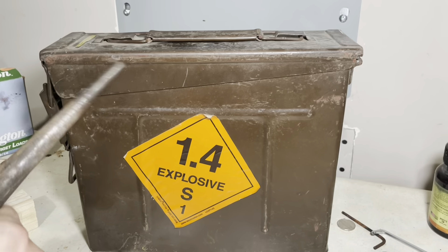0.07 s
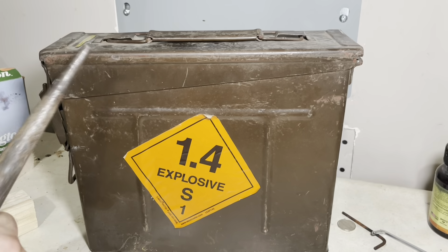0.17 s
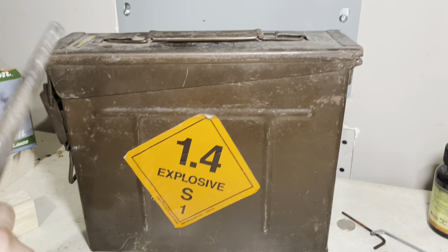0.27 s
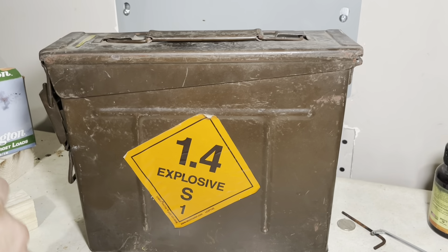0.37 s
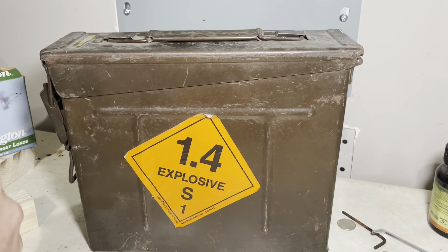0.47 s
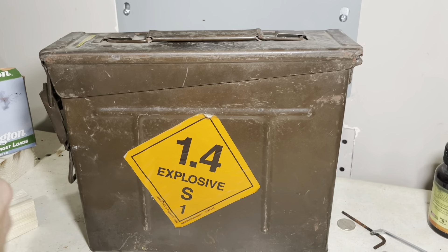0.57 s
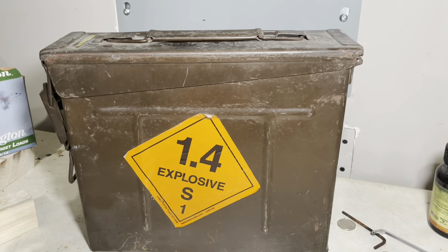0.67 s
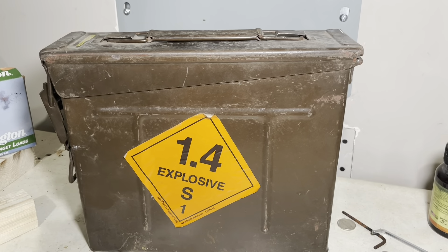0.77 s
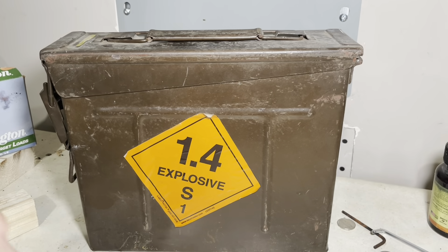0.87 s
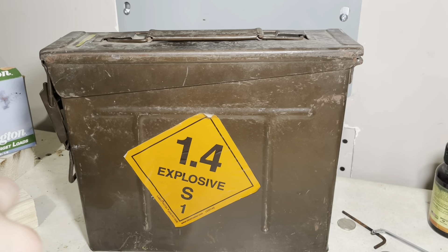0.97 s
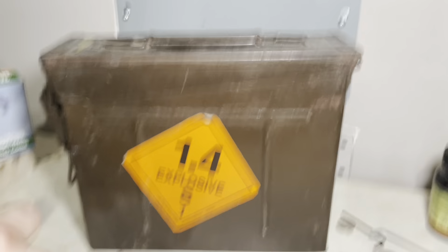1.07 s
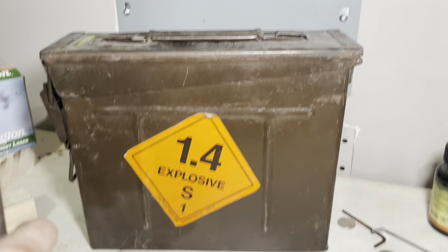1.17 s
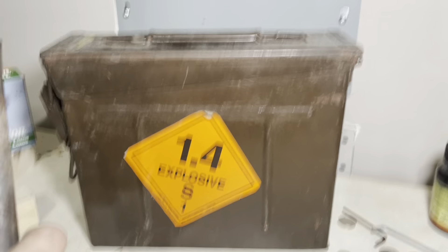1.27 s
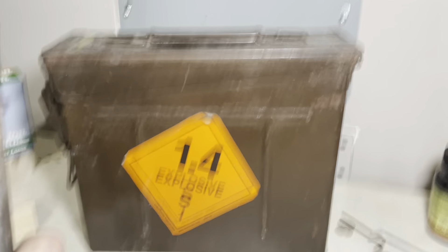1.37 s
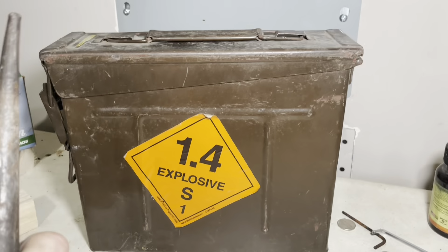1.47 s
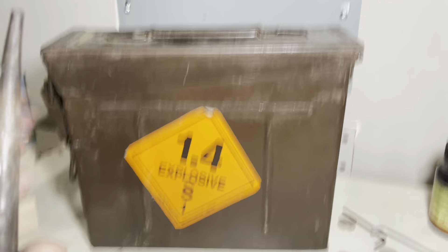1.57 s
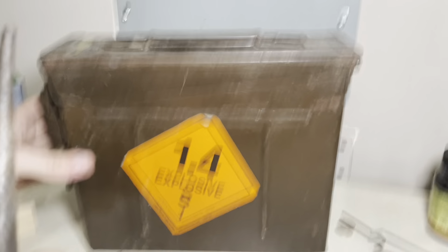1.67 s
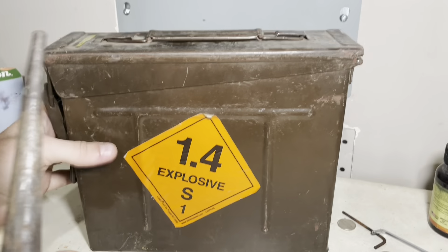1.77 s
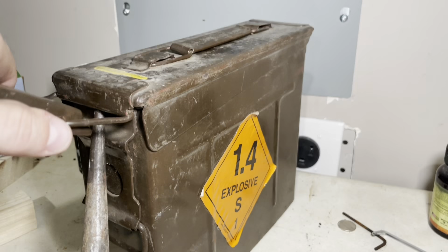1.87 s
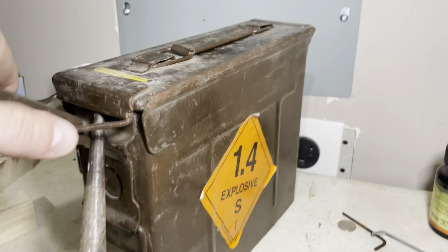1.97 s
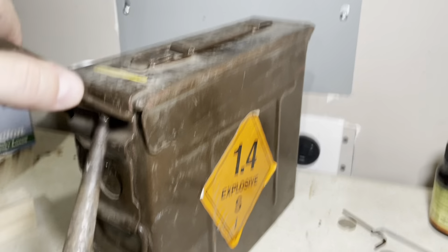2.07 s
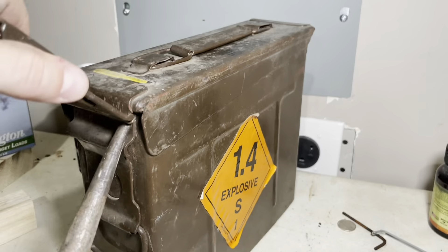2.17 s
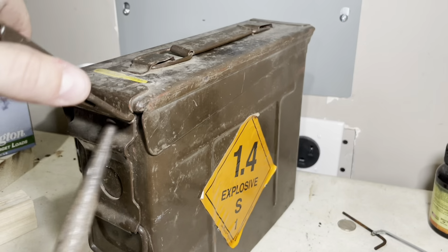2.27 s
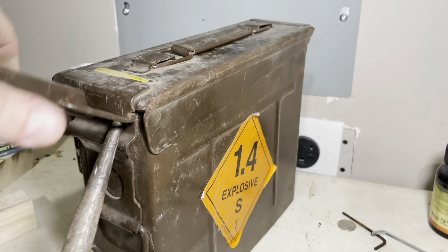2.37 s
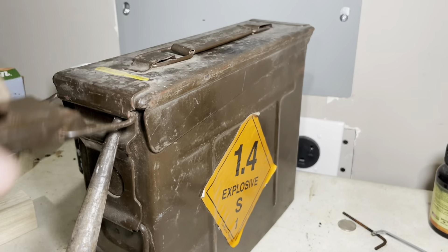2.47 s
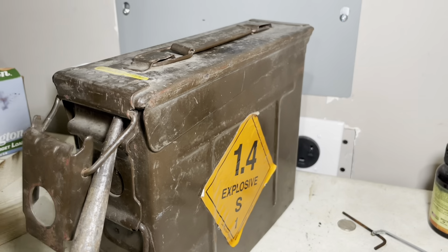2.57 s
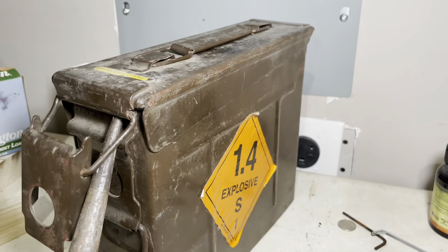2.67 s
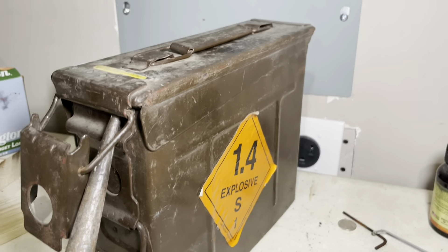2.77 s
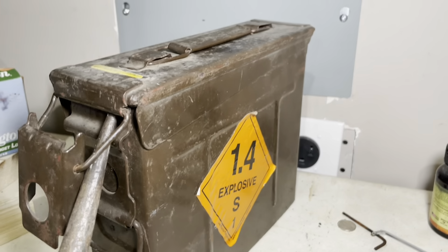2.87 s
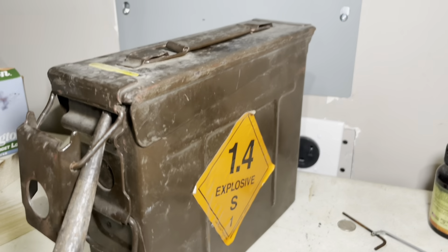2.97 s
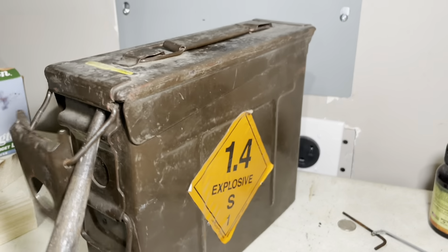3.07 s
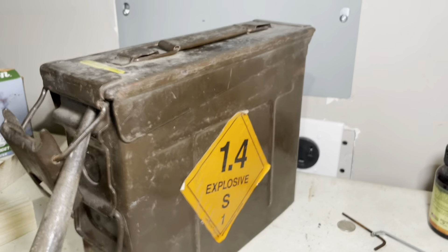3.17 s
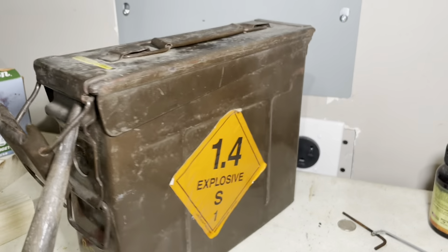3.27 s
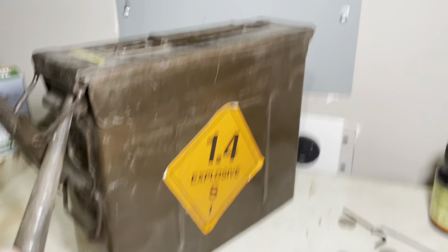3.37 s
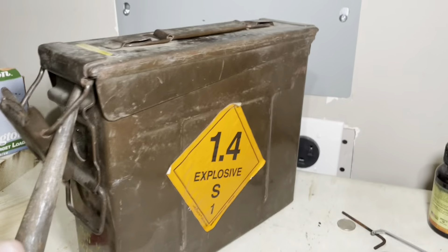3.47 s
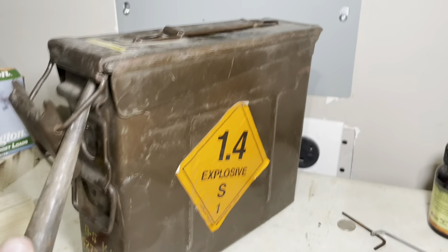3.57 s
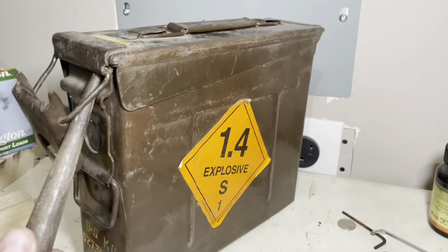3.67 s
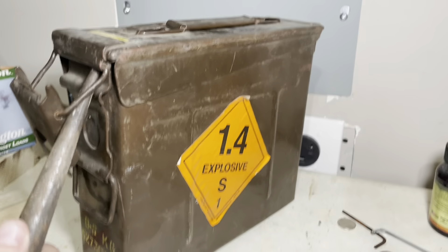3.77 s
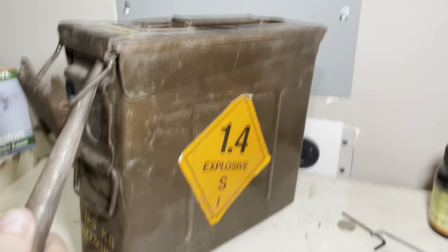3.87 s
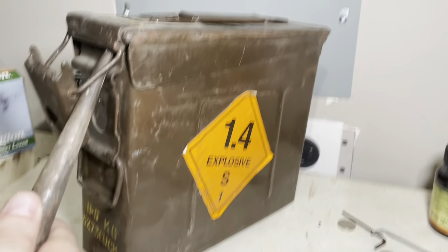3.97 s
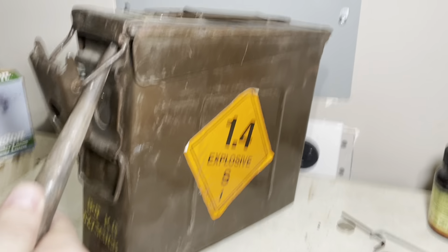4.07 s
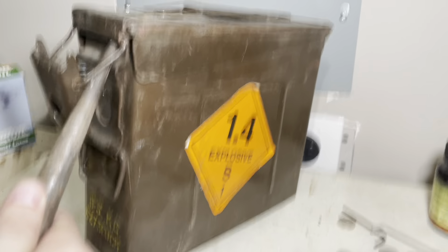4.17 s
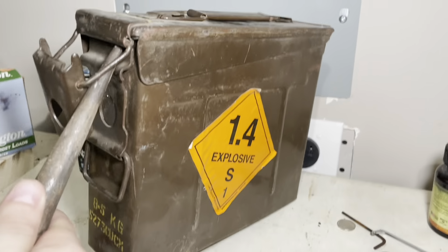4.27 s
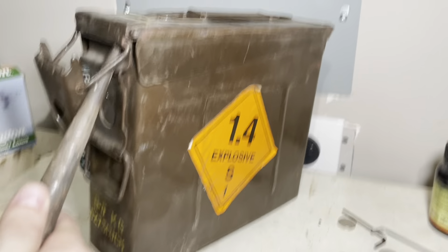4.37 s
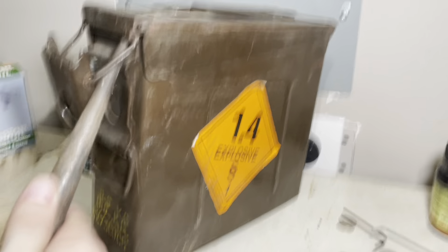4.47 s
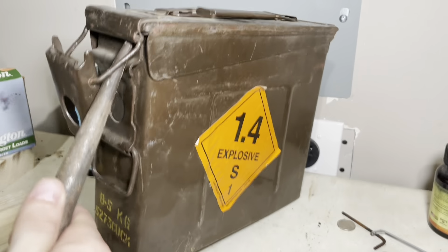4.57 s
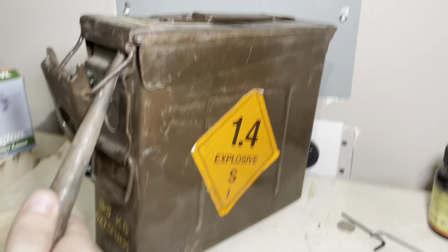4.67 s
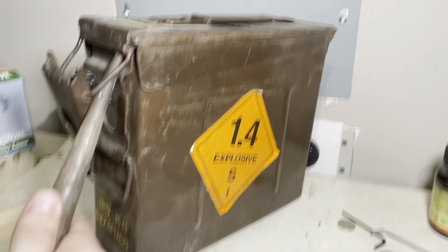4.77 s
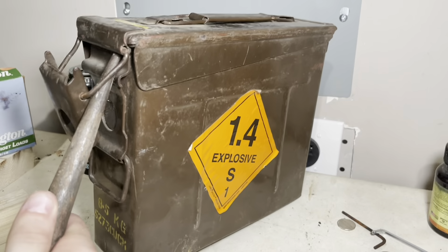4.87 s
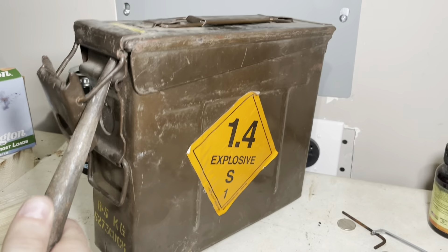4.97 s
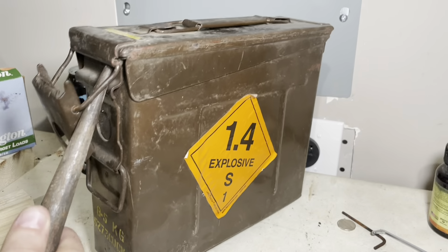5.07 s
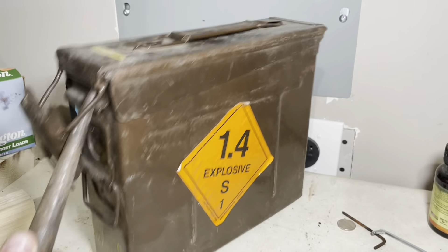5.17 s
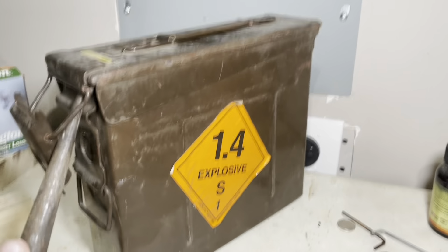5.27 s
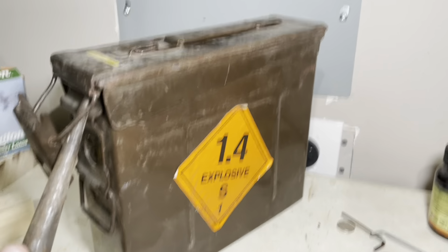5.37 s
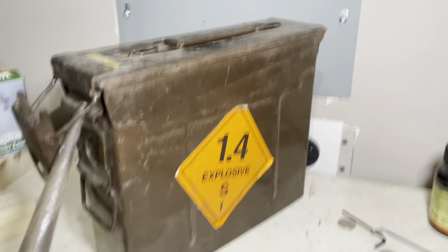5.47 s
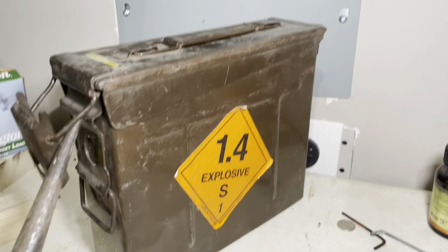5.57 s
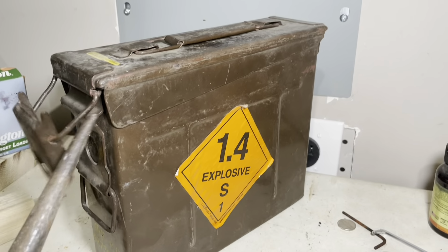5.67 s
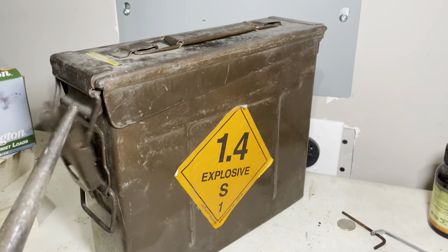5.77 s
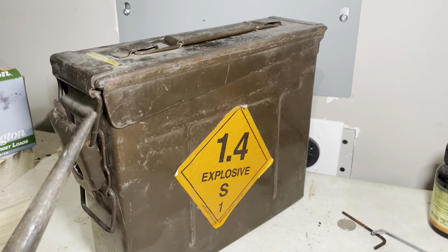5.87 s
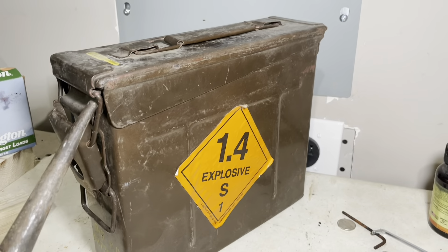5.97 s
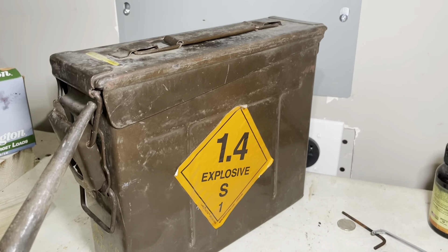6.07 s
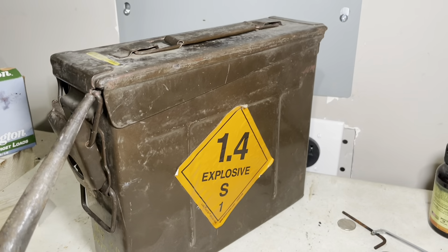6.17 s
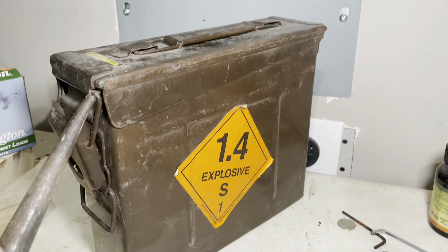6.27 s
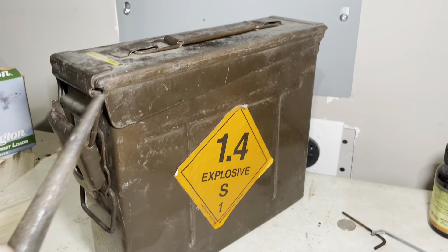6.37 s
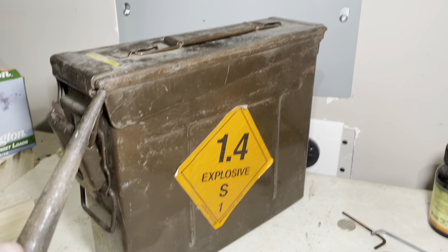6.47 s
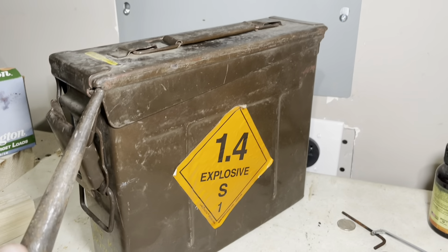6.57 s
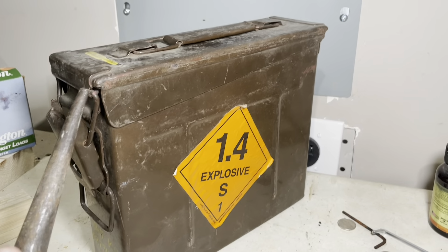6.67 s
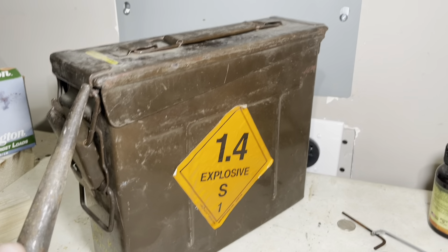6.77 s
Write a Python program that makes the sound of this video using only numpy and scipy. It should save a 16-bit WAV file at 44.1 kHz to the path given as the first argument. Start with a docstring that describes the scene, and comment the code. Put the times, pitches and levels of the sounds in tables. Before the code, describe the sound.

Close metallic prying: a ringing first hit, boomy sheet-steel knocks, latch clinks and creaks, a short juddering drag, then hard uneven bangs.

```python
"""A steel pin pries and bangs at the stuck latch of a sheet-steel can on a workbench, close to a camera.
Over a soft room hush and a low hum, the pin first cracks on the latch and rings on like a bar.
Then the can knocks on the bench, its handle clacks, and the latch ticks, is struck, pings and creaks.
The can is dragged round with a judder and a scrape; knocks and harder bangs follow until the end.
Blows are shaped noise and fading tones, rubbing is noise full of tiny slips, and a hard room answers."""
import sys
import numpy as np
from scipy import signal
from scipy.fft import rfft, irfft, next_fast_len
from scipy.io import wavfile
from scipy.ndimage import uniform_filter1d

SR = 44100
rng = np.random.default_rng(int(sys.argv[2]) if len(sys.argv) > 2 else 0)


def wrap_up_sound(samples):
    """Save the sound to the file named by the first command line argument, as 16-bit audio."""
    columns = np.atleast_2d(samples).T
    # keep every value between -1 and 1, then stretch to whole-number steps
    tamed = np.clip(columns, -1, 1)
    steps = np.round(tamed * 32767).astype(np.int16)
    wavfile.write(sys.argv[1], SR, steps)


N = 300321
CLOCK = np.arange(N) / SR  # time through the whole scene [s]
T = np.arange(SR * 3 // 5) / SR  # time since a blow [s]
BAND_HZ = np.geomspace(45, 16000, 40)  # centres of the narrow bands

# Levels in the tables are relative: each function adds its own offsets.
# how alike the two microphone ports hear a sound: (frequency [Hz], likeness, limited to -1..1)
NEAR_LIKENESS = [(60, 2), (200, 4), (500, 0), (1200, 3), (3000, 9.5), (8000, 0.4)]  # the source itself
FAR_LIKENESS = [(60, 0.93), (200, 0.81), (500, 0.35), (1200, 0.05), (3000, 0.63), (8000, 0.63)]  # the room around it
# spectrum of a steel crack: (frequency [Hz], level [dB per Hz])
CRACK_SPECTRUM = [(200, 4.5), (600, 15.5), (1100, 12), (1900, 1), (2800, 2), (4300, -2.5), (5600, -6.5),
                  (6900, -8), (9400, -12), (11500, -17.5), (14000, -22), (15700, -26), (17000, -19.5)]
# panels that sing under a rub or slide: (frequency [Hz], width [Hz], level [dB])
SINGING_PANELS = [(450, 28, 6.5), (752, 32, 16.5), (996, 30, 3), (1260, 16, 9), (1594, 31, 4.5)]


def amp(db):
    """Turns decibels into a gain."""
    return 10 ** (np.asarray(db) / 20)


def evened(x):
    """Scales a sound to an rms (average strength) of 1."""
    return x / np.sqrt(np.mean(x ** 2) + 1e-20)


def read(points, hz):
    """Reads between the points of a table, with frequency on a log axis."""
    f, value = np.transpose(points)
    return np.interp(np.log(hz + 1), np.log(f + 1), value)


def add(mix, s, sound):
    """Adds a stereo sound into the mix at time s [s]."""
    start = max(round(s * SR), 0)
    part = mix[:, start:][:, :sound.shape[-1]]
    part += sound[..., :part.shape[1]]


def ports(hz):
    """Level and phase with which the left and right microphone port hear a nearby source."""
    # (frequency [Hz], phase lag of the right port [radians])
    port_phase = [(0, -2.5), (1120, 1.52), (1980, 1.29), (3360, 0.94), (4390, 0.6), (5340, 1.13),
                  (6800, -2.5), (8180, -3.5), (10200, -5.5), (12100, -4.5), (13300, -47), (15800, -14.5),
                  (16500, -5.5), (17000, -32)]
    # (frequency [Hz], left level over right level [dB])
    port_balance = [(60, 0), (110, -1), (200, -1), (380, 1), (700, 2.5), (1290, 2), (2380, 1), (4400, 5),
                    (8120, 0), (15000, -1)]
    half = amp(read(port_balance, hz) / 2)
    return np.array([half, np.exp(-1j * read(port_phase, hz)) / half])


def resonances(hz, peaks):
    """Sum of resonance peaks, each given by its frequency [Hz], width [Hz] and level [dB]."""
    return sum(db / (1 + (2 * (hz - f) / width) ** 2) for f, width, db in peaks)


def panels(hz):
    """Gain of the can's panels, which resonate broadly at a few pitches."""
    # broad panel resonances: (frequency [Hz], width [Hz], level [dB])
    panel_peaks = [(179.5, 12, 3), (240, 51, 9.5), (355, 120, 6), (477, 15, 6.5), (634, 43, 5.5),
                   (770, 44, -11.5), (919, 27, 9.5), (1180, 370, 10.5), (2630, 140, 8.5), (3300, 24, -4.5),
                   (5100, 83, 4.5)]
    return amp(resonances(hz, panel_peaks))


def random_spectrum(likeness, size):
    """Frequencies and spectrum of a noise, partly shared between the two ports."""
    hz = np.fft.rfftfreq(size, 1 / SR)
    a, b = rfft(rng.standard_normal((2, size)))
    same = np.clip(read(likeness, hz), -1, 1)
    right = same * a + np.sqrt(1 - same ** 2) * b
    return hz, np.array([a, right]) * ports(hz)


def dense_modes(likeness):
    """The can's countless overlapping modes, as noise in narrow bands: bands x ports x samples."""
    hz, noise = random_spectrum(likeness, 2 * SR)
    number = np.arange(len(BAND_HZ))
    place = np.interp(np.log(hz + 1), np.log(BAND_HZ), number)
    # neighbouring bands overlap as triangles
    shares = np.maximum(1 - abs(place - number[:, None]), 0) * (hz > BAND_HZ[0] / 2)
    return irfft(shares[:, None] * noise * panels(hz)).astype(np.float32)


def excite(modes, gains, envelope):
    """One blow: each band follows its envelope and carries an energy of its gain squared."""
    size = envelope.shape[1]
    start = rng.integers(modes.shape[2] - size)
    bands = modes[:, :, start:start + size] * envelope[:, None].astype(np.float32)
    energy = np.einsum("bcn,bcn->b", bands, bands) / (2 * SR)
    scale = (gains / np.sqrt(energy + 1e-20)).astype(np.float32)
    return np.einsum("b,bcn->cn", scale, bands)


def band_gains(spectrum, tilt):
    """Band gains for a spectrum of total energy 1, then tilted."""
    gains = amp(read(spectrum, BAND_HZ)) * np.sqrt(BAND_HZ)
    return gains / np.linalg.norm(gains) * amp(read(tilt, BAND_HZ))


def burst(length, cycles, shape, contact=0., delay=0.):
    """Envelopes of a contact: bending waves bring the treble first and the bass some cycles later."""
    t = np.maximum(T[:len(T) // 4] - delay, 0)
    rise = cycles / BAND_HZ[:, None] + contact
    return (1 - np.exp(-(t / rise) ** 2)) * np.exp(-(t / (length + rise)) ** shape)


def room_tail(build):
    """Envelopes of the room's echo: it builds up, then each band dies away at its own pace."""
    # (frequency [Hz], time to fall by 60 dB [s])
    room_t60 = [(60, 0.97), (200, 0.72), (600, 0.56), (1500, 0.51), (3000, 0.64), (5600, 0.72), (9000, 0.5),
                (15000, 0.4)]
    return (1 - np.exp(-(T / build) ** 2)) * amp(-60 * T / read(room_t60, BAND_HZ)[:, None])


def ring(modes, spread_db, diffuse, waver_hz=30):
    """Dying tones: the spot that is hit sets their shares, and room echoes make each beat unevenly."""
    hz, db, t60 = np.transpose(modes)
    phase = np.exp(2j * np.pi * rng.random(len(hz)))
    share = amp(db + spread_db * rng.standard_normal(len(hz))) * phase
    a, b = rng.standard_normal((2, len(hz), 64))
    echoes = np.array([np.interp(T * waver_hz, np.arange(len(z)), z) for z in a + 1j * b])
    decaying = np.exp((2j * np.pi * hz - np.log(1000) / t60)[:, None] * T)
    sound = ((ports(hz) * share) @ (decaying * (1 + diffuse * echoes))).real
    # 1 ms fade-in, 0.1 s fade-out
    return sound * np.minimum((T[-1] - T) * 10, 1) * np.minimum(T * 1000, 1)


def cluster(peaks, scatter_db=7, spacing_hz=40):
    """A steady crowd of close modes around each peak, a few standing out, as both ports hear it."""
    hz, noise = random_spectrum(NEAR_LIKENESS, len(T))
    shape = sum(amp(db) / (1 + (2 * (hz - f) / width) ** 2) for f, width, db in peaks)
    heights = rng.uniform(-1.4, 1, len(hz))
    uneven_db = scatter_db * np.interp(hz / spacing_hz, np.arange(len(hz)), heights)
    return evened(irfft(noise * shape * amp(uneven_db), len(T)))


def fade(t60):
    """A 1 ms rise, then a smooth decay by 60 dB in t60 [s]."""
    return np.minimum(T * 1000, 1) * amp(-60 * T / t60)


def waver(size, rate_hz):
    """A random wobble made by joining random points with straight lines."""
    knots = rng.standard_normal(256)
    return np.interp(np.arange(size) / SR * rate_hz, np.arange(len(knots)), knots)


def chatter(size, meetings_per_s=330, depth_db=3):
    """Loose parts meet again and again, chopping the bands above the boom into grains."""
    loose = read([(400, 0), (1200, 1)], BAND_HZ)[:, None]
    return amp(depth_db * loose * np.minimum(waver(size, meetings_per_s), 2))


def background(hush_db=-49, handling_db=-43):
    """Room hush and mains hum, and the low rumble of hands on the can and camera."""
    # spectrum of the room hush: (frequency [Hz], level [dB])
    hush_spectrum = [(20, -48), (40, -24.5), (62, -6), (88, -23), (115, -9), (160, -21.5), (195, -18),
                     (270, -25.5), (430, -32.5), (660, -22.5), (1100, -37.5), (2500, -51), (6000, -58.5),
                     (16000, -103.5)]
    # mains hum: (frequency [Hz], rms level [dB])
    hum_tones = [(60, -47), (120, -53), (190, -52.5)]
    rumble_spectrum = [(20, -15.0), (60, 2.0), (130, -3.0), (300, -16.0), (1000, -27.0), (6000, -57.0)]
    # (time [s], level [dB])
    grip = [(.8, -4.5), (1.3, -2), (2.4, 4), (3.6, 5.5), (4.8, 0.5), (5.5, 9), (6.1, 2), (6.8, 3)]
    size = next_fast_len(N, True)
    hz, noise = random_spectrum(FAR_LIKENESS, size)
    hush = amp(hush_db) * evened(irfft(noise * amp(read(hush_spectrum, hz)))[:, :N])
    hum = 0
    for f, db in hum_tones:
        hum = hum + amp(db) * np.sqrt(2) * np.sin(2 * np.pi * (f * CLOCK + rng.random()))
    hz, noise = random_spectrum(NEAR_LIKENESS, size)
    rumble = evened(irfft(noise * amp(read(rumble_spectrum, hz)))[:, :N])
    return hush + hum + rumble * amp(handling_db + read(grip, CLOCK))


def pin(pin_db=-21, first_db=-5, first_s=0.032, beat_hz=3.85, beat_depth=.75):
    """After the first blow the pin rings like a bar, strongest at first; its lowest two modes beat."""
    # modes of the free pin: (frequency [Hz], level [dB], time to fall by 60 dB [s])
    free_modes = [(1570, -8, .27), (1620, -3, .62), (3692, -11, .56), (3717, -18, .45), (3803, 0, .5),
                  (6605, -20, .45), (6802, -11, .4), (9290, -31, .36), (10200, -27, .33), (10495, -21, .3),
                  (12290, -31, .9)]
    out = np.zeros((2, N))
    low = ring(free_modes[:2], spread_db=0, diffuse=.3, waver_hz=60)
    high = ring(free_modes[2:], spread_db=0, diffuse=.3, waver_hz=80)
    beat = 1 - beat_depth + beat_depth * abs(np.cos(np.pi * beat_hz * T))
    stronger_start = 1 + amp(first_db) * np.exp(-T / first_s)
    add(out, 0, amp(pin_db) * (low * beat + high) * stronger_start)
    return out


def spot_db(hz, clang_hz, favour_db=10.5, width=0.071):
    """How much a struck spot favours tones near its own pitch; width is a share of that pitch."""
    return favour_db / (1 + (np.log(hz / clang_hz) / width) ** 2)


def strikes(near, far, crack_db=-29, held_db=-9, clash_db=-7, shimmer_db=-31, lid_db=-33,
            clang_db=-13, body_db=7, treble_db=24, body_limit_db=6):
    """The pin bangs and rebounds: a short crack and clank, the shimmering latch and lid, and the room."""
    # blows of steel on steel: (time [s], level [dB], treble [dB], sheet-metal body [dB],
    # clang pitch [Hz], time for the clang to fall by 60 dB [s], latch ring [dB]);
    # treble, body and latch ring are relative to the blow
    blows = [(0.0014, -13.5, -32.5, -24, 3810, 0.13, -31), (1.654, -30, -20, -24, 4200, .04, -9),
             (1.686, -22.5, -25, -17, 3980, .03, -20), (1.692, -13.5, -20.5, -21, 3990, 0.04, -2),
             (1.7555, -29.5, -25, -12, 2770, 0.037, -9), (1.8268, -32, -35, -10.5, 2710, 0.047, -13),
             (1.999, -38, -41, 0, 1194, .03, -26.5), (2.099, -24, -40, -6.5, 2730, 0.037, -7),
             (2.2856, -8.5, -25, -11, 2910, 0.026, -4.5), (2.5422, -9.5, -11, -22.5, 4020, 0.035, 6.5),
             (2.563, -25, -22, -13, 1380, 0.047, -11.5), (4.132, -3.5, -17, -13, 2790, 0.067, 1.5),
             (4.4117, -5, -18, -13.5, 2800, 0.014, 4.5), (4.686, -3, -24, -16, 1120, 0.044, 2.5),
             (5.1834, -27, -15.5, 4, 2400, 0.029, -19), (5.206, -14.5, -23.5, -13, 1410, 0.025, -27),
             (5.3372, -17.5, -23, -12.5, 1495, 0.079, -23), (5.3695, -15, -24.5, -16.5, 1640, 0.035, -22),
             (5.4042, -17, -28, -12.5, 2246, 0.15, -6), (5.735, -4, -16, -11, 4480, .02, -13),
             (5.757, -23.5, -14, -31, 4670, .12, -13), (5.806, -18, -17, -11, 3630, 0.028, -7),
             (5.869, -15, -24.5, -13.5, 2770, 0.025, -3.5), (6.044, -37, -25, -7.5, 2810, 0.26, -21),
             (6.339, -27.5, -30, -9.5, 2950, 0.079, -29.5), (6.3653, -35, -39, -7, 3780, .08, -28),
             (6.4141, -31, -34, 2, 2840, .03, -22), (6.607, -14, -12.5, -16, 3690, .04, -10),
             (6.633, -26.5, -37, -6, 3780, 0.21, -26), (6.7244, -35, -33, -11, 3000, 0.044, -16)]
    # a light blow skids, a hard one is over at once: (blow level [dB], crack length [s])
    crack_length = [(-18, 0.0087), (-0.5, 0.0039)]
    # strength of the room's answer: (blow level [dB], echo over crack [dB])
    echo_level = [(-22, -3), (1, -9), (-5.5, -2)]
    # colour of the room's answer: (frequency [Hz], level [dB])
    room_colour = [(200, -17.5), (700, -6.5), (2000, -2.5), (4400, -3), (5700, -1.5), (7200, -12.5),
                   (9500, -5), (15000, -16.5)]
    # bending modes of the pin, damped by the holding hand:
    # (frequency [Hz], level [dB], time to fall by 60 dB [s])
    held_modes = [(1107, -13, 0.096), (2860, -11.5, 0.1), (4430, -11, 0.0082), (9460, -24.5, 0.019),
                  (12300, -29, 0.041)]
    # the latch with the pin pressing on it, before the choke below:
    # (frequency [Hz], level [dB], time to fall by 60 dB [s])
    clash_modes = [(5070, -3.5, 0.05), (5410, 2, 0.035), (5900, -7, .03)]
    # clusters of modes in the latch, then in the lid's sheet steel: (frequency [Hz], width [Hz], level [dB])
    latch_peaks = [(5180, 110, -6), (5590, 300, 0), (5930, 130, -3)]
    lid_peaks = [(850, 160, -7), (1170, 200, -3), (1700, 400, -6), (2350, 300, -9), (2830, 420, 1),
                 (3150, 260, -7), (4050, 500, -7)]
    crack_cycles = 1.8  # the bass of a crack arrives this many cycles late
    rebound_s, rebound_db = 0.0031, -7.5  # the pin bounces and lands once more
    held_treble_hz = 7500  # pin modes above this follow the brightness of the contact
    choke_s = 0.0052  # the pin chokes the clash within this time
    latch_t60_s, lid_t60_s = 0.47, 0.61
    out, tail = np.zeros((2, N)), room_tail(build=0.0033)
    for s, db, treble, body, clang_hz, clang_t60, latch in blows:
        # a hard contact brightens the crack; a glancing one shakes the sheet metal more
        shake, bright = min(body + body_db, body_limit_db), treble + treble_db
        tilt = [(1100, shake), (1900, 0.0062), (6000, 0), (8000, bright)]
        favour = spot_db(BAND_HZ, clang_hz)
        gains = amp(db + crack_db + favour) * band_gains(CRACK_SPECTRUM, tilt)
        length = np.interp(db, *np.transpose(crack_length))
        first = burst(length, crack_cycles, shape=1.4, contact=.0003)
        second = burst(length, crack_cycles, shape=1.4, contact=.0003, delay=rebound_s)
        add(out, s, excite(near, gains, first + amp(rebound_db) * second))

        # the room answers, in uneven grains
        wet = np.interp(db, *np.transpose(echo_level)) + read(room_colour, BAND_HZ)
        add(out, s, excite(far, gains * amp(wet - favour / 2), tail * np.sqrt(chatter(len(T)))))

        # the held pin clanks and the struck spot clangs briefly
        clank_modes = []
        for hz, level, t60 in held_modes:
            level = level + bright * (hz > held_treble_hz) + spot_db(hz, clang_hz) / 2
            clank_modes.append((hz, level, t60))
        clank = ring(clank_modes, spread_db=1.5, diffuse=.3, waver_hz=400)
        clang = ring([(clang_hz, 0, clang_t60)], spread_db=0, diffuse=.25, waver_hz=200)
        add(out, s, amp(db) * (amp(held_db) * clank + amp(clang_db) * clang))

        # the latch clashes, then shimmers on with the lid
        clash = ring(clash_modes, spread_db=1, diffuse=.2, waver_hz=700)
        add(out, s, amp(db + latch + clash_db) * clash * np.exp(-(T / choke_s) ** 2))
        add(out, s, amp(db + latch + shimmer_db) * cluster(latch_peaks) * fade(latch_t60_s))
        add(out, s, amp(db + lid_db) * cluster(lid_peaks) * fade(lid_t60_s))
    return out


def boom(sharp_db, spread_db=2, pivot_hz=190):
    """The can's lowest wall modes build up over about one cycle; their level rises sharp_db an octave."""
    # (frequency [Hz], level [dB], time to fall by 60 dB [s])
    wall_modes = [(143, -1, 0.089), (185, 4, 0.12), (249, -5.5, 0.043), (270.2, 3.5, 0.15), (366.6, 2, 0.1),
                  (464, -5, 0.025)]
    hz, db, t60 = np.transpose(wall_modes)[:, :, None]
    db = db + sharp_db * np.log2(hz / pivot_hz)
    share = amp(db + spread_db * rng.standard_normal(db.shape) - 60 * T / t60)
    turns = hz * T + rng.random(hz.shape)
    return (share * (1 - np.exp(-(T * hz) ** 2)) * np.sin(2 * np.pi * turns)).sum(0)


def knocks(near, far, knock_db=-28, boom_db=-20, rattle_db=2, wet_db=-12, thump_db=1, wall_db=6):
    """The can tips and drops back: its walls boom, its panels rattle and the bench top swings under it."""
    # landings: (time [s], level [dB], bench thump [dB], favoured wall pitch [Hz], wall level [dB])
    landings = [(1.0277, -5.5, -30, 390, -7), (1.076, -12, -34, 199, -13.5),
                (1.179, -14.5, -41.5, 227, -17), (1.213, -20, -51, 233, -16.5),
                (1.242, -17.5, -30, 201.5, -21), (1.286, -16.5, -18, 194, -24), (1.33, -39, -21, 189, -33),
                (1.561, -19, -23.5, 191, -25), (1.602, -22.5, -20.5, 174, -37),
                (1.964, -21, -34.5, 255, -34), (1.997, -19.5, -24, 195, -27.5),
                (3.309, -15, -15, 152.4, -21.5), (3.34, -23.5, -21, 144, -22.5),
                (3.5, -16, -22, 248, -26.5), (3.561, -24.5, -27, 162, -23.5),
                (3.802, -46.5, -20.5, 186, -39), (3.911, -20, -24.5, 155, -24), (4.011, -15, -18, 155, -22),
                (4.127, -16.5, -23.5, 562, -20), (4.286, -3.5, -12.5, 169.5, -16.5),
                (4.405, -16, -22, 170, -27), (4.58, -4.5, -18, 367, -24), (4.682, -15, -23, 480, -31.5),
                (5.184, -9.5, -21, 146, -13.5), (5.198, -3, -15.5, 201, -14),
                (5.22, -17.5, -22, 266, -22.5), (5.328, -15.5, -24, 163, -27),
                (5.378, -17.5, -29.5, 182, -20), (5.445, -4, -35.5, 503, -12.5),
                (5.493, -13.5, -36, 200, -17.5), (5.519, -23, -42.5, 198, -18.5),
                (6.165, -22.5, -45, 190, -29.5), (6.413, -21, -44, 314, -30.5),
                (6.636, -22.5, -40, 388, -28.5), (6.721, -24, -54, 316, -37)]
    # a hard landing settles slightly sooner: (landing level [dB], length [s])
    knock_length = [(-22, 0.023), (3.5, 0.022)]
    # spectrum of a landing: (frequency [Hz], level [dB per Hz])
    thud_spectrum = [(60, 2.5), (130, 1.5), (250, -1.5), (450, -8), (700, -12.5), (1200, -19.5),
                     (2200, -30.5), (5000, -42.5), (8000, -56.5), (15000, -58.5)]
    boom_growth, rattle_growth = 0.054, 0.62  # harder knocks boom and rattle more: extra dB per dB
    # a landing that hardly moves the bench is sharper; each per dB of level over thump:
    sharp_growth = 0.28  # dB of mids
    boom_sharpness = 0.49  # dB an octave in the wall modes
    bench_hz, bench_sag_per_s, bench_swell_s = 97, 6.37, 0.018  # pitch sags as the contact relaxes
    wall_rise_s, wall_t60_s = 0.0027, 0.083
    out, tail = np.zeros((2, N)), room_tail(build=0.017)
    wet = wet_db + read([(200, 1.0), (1000, 6.5)], BAND_HZ)  # loose parts keep the mids going
    turns = bench_hz * T / (1 + bench_sag_per_s * T)
    swell = (T / bench_swell_s) ** 2 * np.exp(2 * (1 - T / bench_swell_s))
    swing = swell * np.sin(2 * np.pi * turns)
    for s, db, thump, wall_hz, wall in landings:
        sharp = sharp_growth * (db - thump)
        tilt = [(250, 0.002), (400, sharp), (1000, sharp + rattle_db + rattle_growth * db)]
        gains = amp(db + knock_db) * band_gains(thud_spectrum, tilt)
        blow = burst(np.interp(db, *np.transpose(knock_length)), cycles=.9, shape=1.5)
        add(out, s, excite(near, gains, blow * chatter(blow.shape[1])))
        add(out, s, excite(far, gains * amp(wet), tail * np.sqrt(chatter(len(T)))))
        add(out, s, amp(db + boom_db + boom_growth * db) * boom(boom_sharpness * (db - thump)))
        rise = 1 - np.exp(-(T / wall_rise_s) ** 2)
        note = np.sin(2 * np.pi * (wall_hz * T + rng.random())) * rise
        add(out, s, amp(wall + wall_db) * note * fade(wall_t60_s))
        add(out, s, amp(thump + thump_db) * swing)
    return out


def clacks(near, far, clack_db=-30, wet_db=-9):
    """The carrying handle jumps as the can lands and clacks on the lid: short noise and its echo."""
    # (time [s], level [dB])
    handle_hits = [(1.033, -29), (1.086, -36), (1.182, -43), (1.218, -40.5), (1.2589, -36.5), (5.23, -31),
                   (5.455, -41), (5.495, -46)]
    # (frequency [Hz], level [dB per Hz])
    clack_spectrum = [(300, -7), (1200, 6), (2500, -6), (5300, -9.5), (7000, -17), (14000, -30)]
    out, tail = np.zeros((2, N)), room_tail(build=0.005)
    for s, db in handle_hits:
        gains = amp(db + clack_db) * band_gains(clack_spectrum, [(1000, 0)])
        add(out, s, excite(near, gains, burst(0.0024, cycles=0.88, shape=0.91)))
        add(out, s, excite(far, gains * amp(wet_db), tail))
    return out


def ticks(near, far, tick_db=-28, wet_db=-8):
    """The loose latch taps lightly as the can moves: tiny bright cracks and their echo."""
    # (time [s], level [dB])
    taps = [(1.549, -50), (1.554, -39.5), (1.58, -40.5), (1.61, -38.5), (1.858, -52), (2.0152, -47.5),
            (3.3053, -42.5), (4.278, -33), (4.462, -29.5), (4.7242, -28.5), (5.611, -53)]
    out, tail = np.zeros((2, N)), room_tail(build=0.0078)
    for s, db in taps:
        gains = amp(db + tick_db) * band_gains(CRACK_SPECTRUM, [(1000, 1.6), (5000, 3.4), (9000, 18.2)])
        add(out, s, excite(near, gains, burst(0.0027, cycles=0.93, shape=0.53)))
        add(out, s, excite(far, gains * amp(wet_db), tail))
    return out


def wire(favour_db=11, first_db=8, first_s=0.022):
    """The latch's wire loop, left free by some blows, pings high and thin in its own modes."""
    # (time [s], level [dB], pitch that rings most [Hz])
    pings = [(1.692, -63, 8030), (2.223, -77, 3830), (2.543, -52, 8130), (2.545, -50, 11900),
             (4.292, -53.5, 9900), (5.734, -47, 12300), (6.606, -42, 9420)]
    # modes of the wire loop: (frequency [Hz], level [dB], time to fall by 60 dB [s])
    wire_modes = [(3667, -1, .16), (3830, 0, .2), (5254, -4, .2), (8030, -5, .22), (9420, -8, .3),
                  (10010, -10, .25), (10520, -12, .25), (10820, -10, .2), (12215, 2, .3), (13110, -6, .2)]
    out = np.zeros((2, N))
    for s, db, top_hz in pings:
        modes = []
        for hz, level, t60 in wire_modes:
            favour = favour_db * np.exp(-((hz - top_hz) / 500) ** 2)
            modes.append((hz, level + favour, t60))
        ping = ring(modes, spread_db=1.5, diffuse=.35)
        add(out, s, amp(db) * ping * (1 + amp(first_db) * np.exp(-T / first_s)))
    return out


def friction(times, level_db, colour, slips_per_s, grain_db, smooth):
    """Tiny slips of uneven size shake the panels under a stroke; gives its start time and sound."""
    hz, noise = random_spectrum(FAR_LIKENESS, SR)
    chance = rng.random(SR)
    size = np.minimum(rng.exponential(1, SR), 4)
    impulses = (chance < slips_per_s / SR) * amp(grain_db * size)
    slips = signal.lfilter([1], [1, -np.exp(-1000 / SR)], impulses)  # each slip dies away over about 1 ms
    rough = irfft(noise) * (smooth + evened(slips))
    singing = amp(resonances(hz, SINGING_PANELS))
    sound = irfft(rfft(rough) * amp(read(colour, hz)) * panels(hz) * singing)
    t = np.arange(times[0], times[-1], 1 / SR)
    level = amp(np.interp(t, times, level_db)) * signal.windows.tukey(len(t), .1)
    return times[0], evened(sound[:, :len(t)]) * level


def scrape(pitch_hz, width_hz):
    """A fuzzy resonance of rms 1 that follows a pitch curve: slow noise moved up to that pitch."""
    low_pass = signal.butter(2, width_hz / 2, fs=SR, output="sos")
    fuzz = signal.sosfilt(low_pass, rng.standard_normal((2, len(pitch_hz))))
    tone = (fuzz[0] + 1j * fuzz[1]) * np.exp(2j * np.pi * np.cumsum(pitch_hz) / SR)
    return evened((ports(pitch_hz) * tone).real)


def hinge(creak_hz=112, range_db=52, ring_width_hz=210, glide_per_s=-1.2):
    """The latch swings on its wire hinge, sticking and letting go, and rings at the spot that binds."""
    # (time of fastest movement [s], level [dB], length [s], ring pitch [Hz], ring over rub [dB])
    swings = [(1.969, -43, 0.19, 1470, -17), (2.101, -28.5, .18, 5380, -24), (3.064, -34.5, .14, 2100, -4)]
    # colour of the rub: (frequency [Hz], level [dB])
    rub_colour = [(180, -11), (300, -11), (580, -11.5), (813, -15), (1120, -19), (1700, -21.5), (2850, -20),
                  (3300, -30), (4300, -27), (5420, -45), (7010, -40), (7600, -68), (10300, -43),
                  (14000, -79)]
    out = np.zeros((2, N))
    position = np.linspace(-1, 1, 21)
    for s, db, length, ring_hz, ring_db in swings:
        # each swing swells and fades in one arch
        times, level = s + position * length / 2, db - range_db * position ** 2
        start, rub = friction(times, level, rub_colour, slips_per_s=3000, grain_db=3, smooth=2.7)
        t = T[:rub.shape[1]]
        # the ring sinks by a share of its pitch each second
        pitch = ring_hz * (1 + glide_per_s * (start + t - s))
        ring_level = amp(np.interp(start + t, times, level) + ring_db)
        rub = rub + scrape(pitch, ring_width_hz) * ring_level
        # the hinge sticks and lets go at a slightly uneven pace
        pace = creak_hz * (1 + 0.085 * evened(uniform_filter1d(rng.standard_normal(len(t)), 400)))
        release = uniform_filter1d(np.exp(-3 * (np.cumsum(pace) / SR % 1)), size=45)
        add(out, start, rub * evened(.15 + release))
    return out


def slide(judder_db=-4, grit_db=3, groan_db=1, squeal_db=-14, scrape_db=-5, scrape_width_hz=700):
    """The can is dragged round: its base judders and grinds over grit, a wall groans, the panels sing."""
    # (time [s], judder level [dB], grit level [dB], scrape pitch [Hz])
    drag = [(2.799, -53, -72, 701), (2.88, -26, -50.5, 1200), (2.92, -27.5, -41, 1593),
            (2.985, -28, -39, 2184), (3.022, -41.5, -43, 2070), (3.072, -43, -41, 2197),
            (3.155, -30.5, -47, 1703), (3.201, -65, -53, 988), (3.25, -47, -53.5, 773)]
    # colours of the juddering base and of the grit: (frequency [Hz], level [dB])
    judder_colour = [(60, 4), (130, 12.5), (190, 4.5), (300, -6), (430, 4), (600, -18), (1000, -41.5)]
    grit_colour = [(300, -6), (450, 0), (700, -0.5), (1300, -7.5), (2200, -8), (3000, -14.5), (4500, -16),
                   (7000, -31.5), (13000, -39)]
    groan_hz = 186  # the wall mode that the juddering base locks on to
    out = np.zeros((2, N))
    s, judder, grit, pitch = np.transpose(drag)
    add(out, *friction(s, judder + judder_db, judder_colour, slips_per_s=330, grain_db=-8.0, smooth=0.66))
    add(out, *friction(s, grit + grit_db, grit_colour, slips_per_s=290, grain_db=1.5, smooth=1.0))
    t = np.arange(s[0], s[-1], 1 / SR)
    scrape_level = amp(np.interp(t, s, grit) + scrape_db)
    add(out, s[0], scrape(np.interp(t, s, pitch), scrape_width_hz) * scrape_level)
    tones = [(groan_hz, judder + groan_db)]
    tones += [(f, grit + squeal_db + db) for f, _, db in SINGING_PANELS]
    for hz, level in tones:
        # pitch and level both wobble
        turns = np.cumsum(hz * (1 + .022 * waver(len(t), 60))) / SR
        tone = (ports(hz)[:, None] * np.exp(2j * np.pi * turns)).real * amp(3 * waver(len(t), 50))
        add(out, s[0], tone * amp(np.interp(t, s, level)))
    return out


def scene():
    """All sources around the bench, added together."""
    near, far = dense_modes(NEAR_LIKENESS), dense_modes(FAR_LIKENESS)
    steel = pin() + strikes(near, far) + clacks(near, far) + ticks(near, far) + wire()
    return background() + steel + knocks(near, far) + hinge() + slide()


def record(dry, low_cut_hz=38, top_hz=14000, edge_hz=16500):
    """Microphone roll-offs; the level dips briefly once; loud peaks are rounded off; then the band limit."""
    roll_off = signal.butter(3, [low_cut_hz, min(top_hz, edge_hz)], "band", fs=SR, output="sos")
    dry = signal.sosfilt(roll_off, dry)
    dip = amp(-18 * np.exp(-((CLOCK - 1.912) / 0.011) ** 2))
    rounded = dry * dip / (1 + dry ** 4) ** (1 / 4)
    band_limit = signal.firwin(255, edge_hz, window=("kaiser", 9), fs=SR)
    return signal.oaconvolve(rounded, band_limit[None], "same")


dry = scene()
out = record(dry)
wrap_up_sound(out)
```